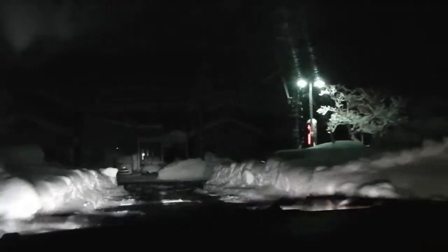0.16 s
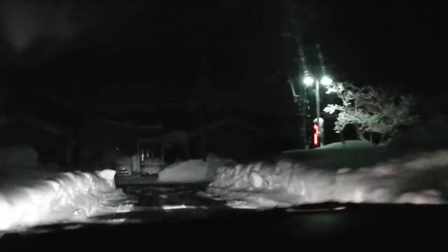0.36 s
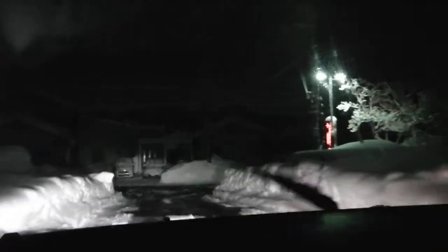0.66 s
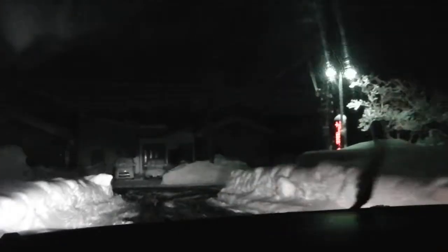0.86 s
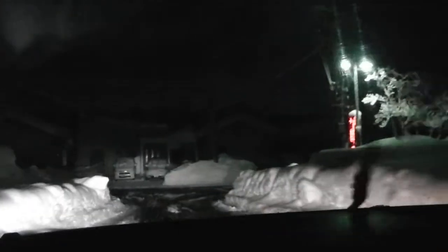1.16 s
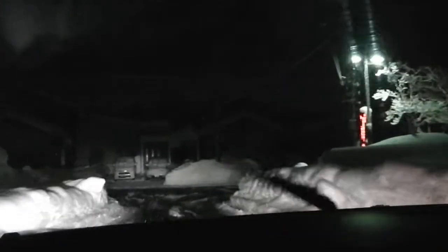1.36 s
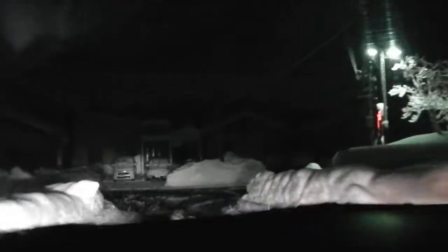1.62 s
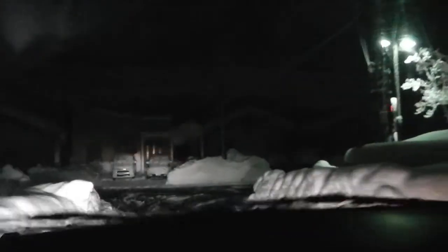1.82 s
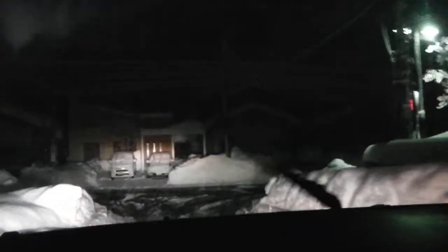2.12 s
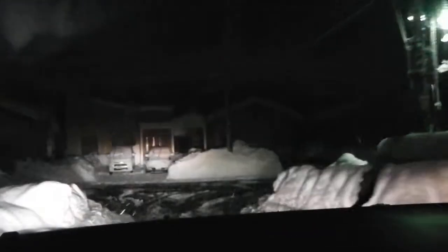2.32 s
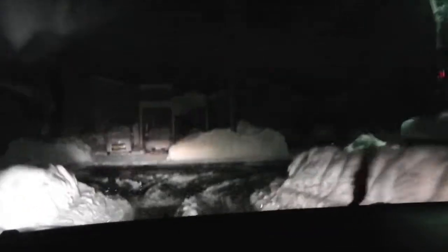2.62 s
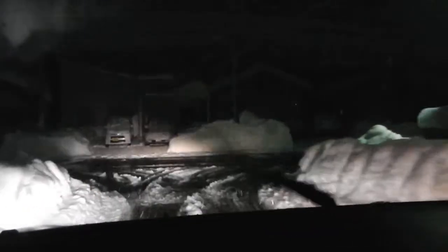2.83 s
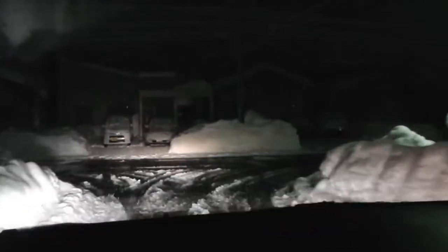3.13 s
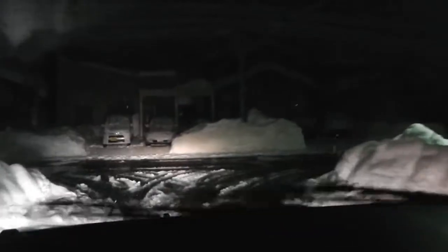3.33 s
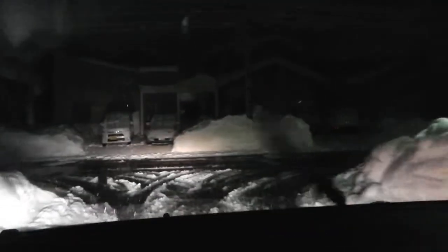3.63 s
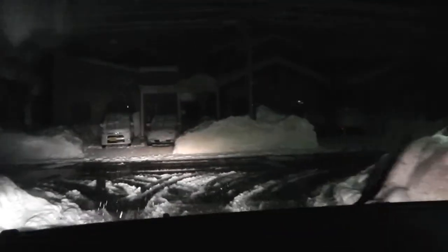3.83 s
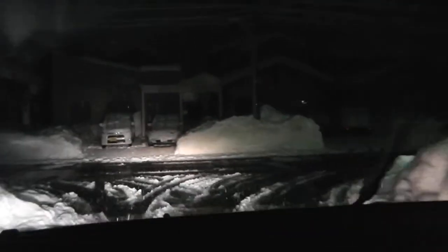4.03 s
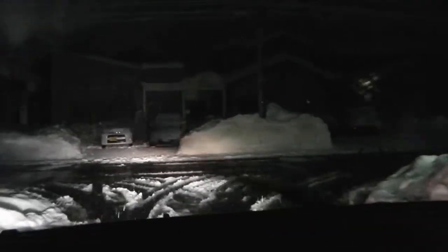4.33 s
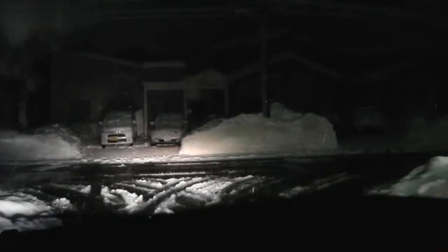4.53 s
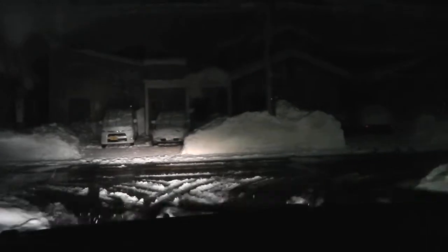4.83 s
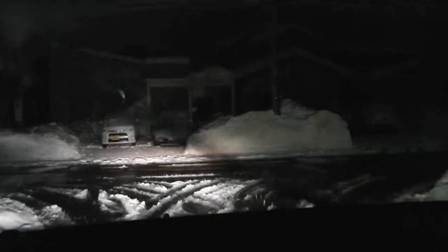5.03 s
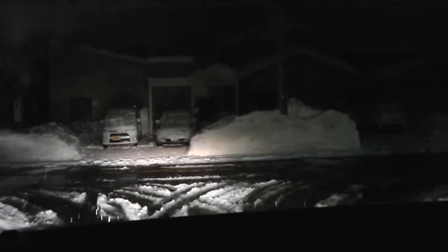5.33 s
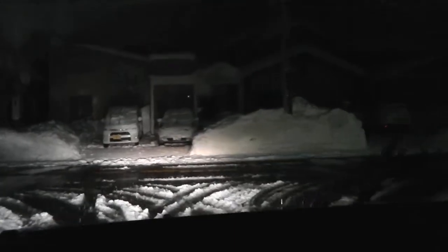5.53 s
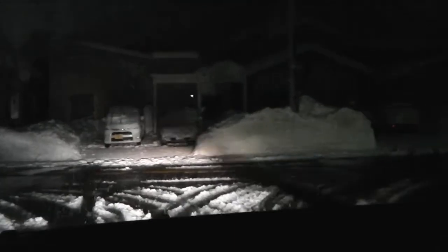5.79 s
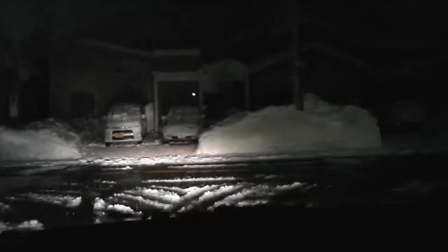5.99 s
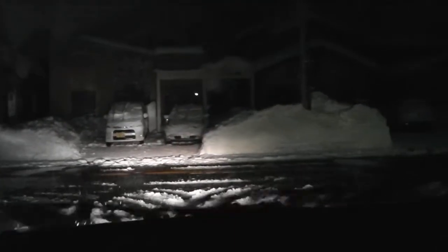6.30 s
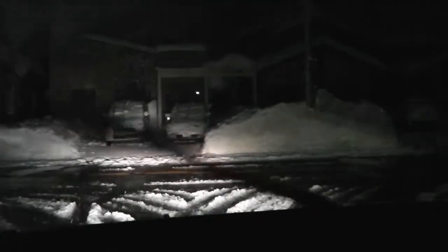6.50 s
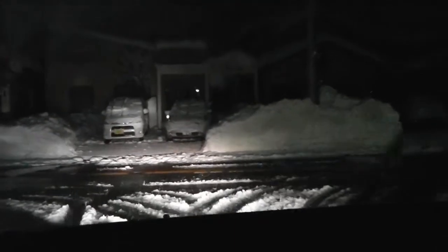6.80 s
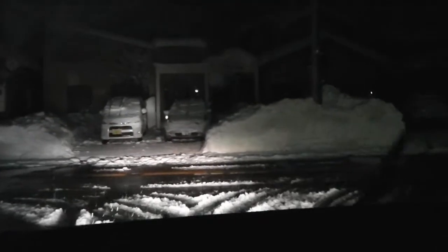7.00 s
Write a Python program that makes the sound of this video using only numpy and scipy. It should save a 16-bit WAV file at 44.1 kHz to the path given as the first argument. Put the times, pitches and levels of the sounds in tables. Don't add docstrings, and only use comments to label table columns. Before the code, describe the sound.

Muffled cabin boom and soft heater air, with periodic wiper knocks, a quick stalk clatter, then regular turn-signal ticking and small trim snaps.

```python
import sys
import numpy as np
from scipy import signal
from scipy.fft import rfft, irfft, next_fast_len
from scipy.io import wavfile
from scipy.ndimage import uniform_filter1d, map_coordinates

SR = 44100
rng = np.random.default_rng(int(sys.argv[2]) if len(sys.argv) > 2 else 0)


def voltage_ratio(level):
    return 10 ** (np.asarray(level, float) / 20)


def store_wav(level_fs):
    pcm = np.round(np.clip(np.atleast_2d(level_fs), -1, 1) * 32767)
    wavfile.write(sys.argv[1], SR, pcm.T.astype(np.int16))


N = 315315


def unit(x):
    return x / np.sqrt(np.mean(x ** 2) + 1e-20)


def along(points, hz):
    f, v = np.transpose(points)
    return np.interp(np.log(hz + 1), np.log(f + 1), v)


def curves(rows):
    s, *columns = np.transpose(rows)
    return [np.interp(np.arange(N) / SR, s, column) for column in columns]


def wobble(rate):
    knots = rng.standard_normal(int(N * rate / SR) + 4)
    return map_coordinates(knots, [np.arange(N) * rate / SR])


def filtered(x, response):
    n = x.shape[-1]
    m = next_fast_len(n + SR // 4)
    return irfft(rfft(x, m) * response(np.fft.rfftfreq(m, 1 / SR)), m)[..., :n]


def modes(rows):
    def response(f):
        return sum((-1) ** k * voltage_ratio(db) * 1j * f * width / (hz * hz - f * f + 1j * f * width)
                   for k, (hz, width, db) in enumerate(rows))
    return response


def below(response, edge_hz):
    return lambda f: response(f) / (1 + 1j * f / edge_hz) ** 2


def rush(response, patchy_db):
    z = signal.stft(rng.standard_normal((2, N)), nperseg=512)[2]
    field = uniform_filter1d(rng.standard_normal(z.shape[1:]), 6, 0)
    field = unit(uniform_filter1d(field, 10, 1))
    noise = signal.istft(z * voltage_ratio(patchy_db * field), nperseg=512)[1][:, :N]
    pair = filtered(noise, response)
    return pair / np.std(pair[0])


def steadied(pair, seconds):
    swell = uniform_filter1d(pair[0] ** 2, size=round(seconds * SR))
    swell = uniform_filter1d(swell, size=round(seconds * SR / 2))
    return pair / np.sqrt(np.abs(swell) + 0.096)


def shake(rise, t60):
    t = np.arange(SR // 5) / SR
    swell = (1 - np.exp(-t / max(rise, 1e-4))) ** 2
    return rng.standard_normal((2, len(t))) * swell * voltage_ratio(-60 * t / max(t60, 1e-3))


def ring(rows):
    hz, db, t60, delay = np.transpose(rows)[..., None]
    t = np.maximum(np.arange(SR // 5) / SR - delay, 0)
    level_db = db + 0.37 * rng.standard_normal(hz.shape)
    swell = voltage_ratio(level_db - 60 * t / t60) * (1 - np.exp(-t / 0.0011))
    phase = rng.random((2, len(rows), 1))
    return np.sum(swell * np.sin(2 * np.pi * (hz * t + phase)), axis=1)


def add(track, s, db, sound):
    peak = np.sqrt(2 * np.max(np.abs(uniform_filter1d(sound[0] ** 2, size=200))))
    track[:, round(s * SR):][:, :sound.shape[1]] += voltage_ratio(db) * sound / peak


# (time [s], level [dB], lean to the upper modes [dB])
ROAD = [(0.0, -31, 5), (0.38, -32, 1), (0.69, -27.5, 3.5), (0.92, -30, 6), (1.13, -30.5, 3.5),
        (2.15, -29, 0.5), (2.67, -31.5, -1), (3.23, -31, -3), (3.6, -32, -8.5), (3.96, -30.5, 0),
        (4.14, -34.5, -2), (4.48, -35.5, -6.5), (5.1, -35.5, -0.5), (5.79, -36, 0), (6.59, -39, -2.5),
        (6.97, -32, 8.5), (7.15, -39.5, -8)]
# (time [s], swell [dB])
RUTS = [(0.0, 19.5), (0.42, 1), (0.67, 0), (0.86, 7), (1.0, -15), (1.06, -4), (1.53, -4), (1.73, 7),
        (2.45, 5.5), (2.79, 10), (2.87, 9), (3.01, 4.5), (3.08, 1.5), (3.29, 5.5), (3.42, 6), (3.54, 1.5),
        (3.94, 10), (4.52, 1.5), (5.22, 4), (5.42, 8), (6.59, 9), (6.63, -6), (6.93, 8)]
# (frequency [Hz], width [Hz], level [dB])
LOW_BOOM = [(40.3, 23, -10), (65.7, 38.3, -10.5), (88.7, 20.4, -6)]
HIGH_BOOM = [(120.5, 13.3, -0.5), (155.3, 9.4, 0), (183.5, 13.2, -3.5)]


def boom():
    heave_s = 0.026
    lumpy_db, lumps_per_s = 2, 9
    shaking_db, lean_db = curves(ROAD)
    t = np.arange(N) / SR
    heave_db = sum(db * np.maximum(1 - np.abs(t - s) / (2 * heave_s), 0) for s, db in RUTS)
    low_db = shaking_db - 0.5 - lean_db / 2 + heave_db + lumpy_db * wobble(lumps_per_s)
    high_db = shaking_db - 3 + lean_db / 2 - 0.15 * heave_db + lumpy_db * wobble(lumps_per_s)

    def cabin(rows):
        steep = lambda f: modes(rows)(f) / (1 + (f / 215) ** 6)
        return steadied(rush(steep, patchy_db=-2.3), seconds=0.056)

    return voltage_ratio(low_db) * cabin(LOW_BOOM) + voltage_ratio(high_db) * cabin(HIGH_BOOM)


# (time [s], level [dB])
SLUSH = [
    (0.0, -63),
    (0.69, -67),
    (2.09, -63.5),
    (3.09, -66),
    (4.42, -66),
    (4.76, -63.5),
    (5.24, -66.5),
    (5.95, -67),
    (7.15, -60.5),
]
# (frequency [Hz], density [dB per Hz])
DUCTS = [(120, -4), (200, 0), (233, -6.5), (269, -4), (297, -9.5), (383, 0), (420, -4.5), (485, -2.5),
         (564, -6), (593, -6), (662, -2), (860, -9), (936, -10), (1300, -23), (1500, -21.5), (1950, -78),
         (3300, -120)]
RUB = [(650, -16), (1100, -6), (1210, -2.5), (1310, -10), (1670, -4.5), (2160, -9), (2480, -7.5),
       (3500, -10.5), (3940, -13.5), (4270, -15.5), (5230, -19.5), (6760, -28), (7500, -28), (9750, -57),
       (16500, -120)]
HISS = [(3530, -24), (6000, -4), (7820, -9.5), (8520, -6), (9240, -7), (9990, -7), (15900, -9)]


def air():
    shaking_db, lean_db = curves(ROAD)
    swing_db = shaking_db - shaking_db.mean()
    fan_db = -44.5 + 0.1 * swing_db + 0.15 * lean_db
    rub_db = -53.5 + 0.25 * swing_db
    hiss_db = 3.5 + curves(SLUSH)[0]
    flutter = wobble(12)

    def layer(db, shape, patchy_db):
        moving_db = db + 0.24 * flutter + 0.66 * wobble(25)
        return voltage_ratio(moving_db) * rush(lambda f: voltage_ratio(along(shape, f)), patchy_db)

    return layer(fan_db, DUCTS, 1.2) + layer(rub_db, RUB, 1.6) + layer(hiss_db, HISS, 0.8)


TRIM = [(0.3244, -46, 2600), (0.3322, -33, 2500), (1.6765, -34, 2200), (2.1081, -41, 1770),
        (2.176, -26, 1440), (2.4928, -33.5, 1450), (2.7708, -29.5, 2400), (3.2074, -36.5, 2380),
        (3.221, -38, 1570), (3.3485, -39, 1620), (3.5844, -35.5, 1500), (3.94, -27.5, 1650),
        (4.6937, -34, 2650), (5.4287, -24, 1900), (5.4291, -41, 2700), (6.1729, -41, 1830),
        (6.1914, -34, 1720)]
RUBBER = [
    (1.9889, -42, 3900),
    (2.177, -26.5, 4440),
    (2.7693, -31, 3820),
    (3.242, -33.5, 3900),
    (4.5537, -34, 3750),
    (4.573, -39, 3940),
    (4.6786, -31, 3970),
    (5.001, -36, 4040),
]
CRUST = [
    (1.0096, -46, 3800),
    (1.0793, -37.5, 5300),
    (1.3766, -29, 5170),
    (1.6756, -38, 4400),
    (6.9, -42.5, 4900),
    (6.939, -41, 4900),
]
SPRAY = [
    (1.9565, -40.5, 9500),
    (3.7698, -47, 9500),
    (6.3094, -57, 9500),
    (6.8838, -47, 9400),
    (6.9097, -47, 9400),
    (7.0698, -43, 9500),
]
# (treble [dB], width over centre [ratio], t60 [s])
SNAP_KINDS = [
    (-28, .82, 0.058),
    (-19, 0.54, 0.021),
    (-7.5, 0.59, 0.071),
    (-3, 0.97, .06),
]


def snaps(track):
    for rows, (treble_db, breadth, t60) in zip((TRIM, RUBBER, CRUST, SPRAY), SNAP_KINDS):
        edge = modes([(12000, 6000, treble_db / 2)])
        for s, db, hz in rows:
            body = modes([(hz, breadth * hz, 0)])
            sound = filtered(shake(0.0018, t60), lambda f: body(f) ** 2 + edge(f) ** 2)
            add(track, s - 0.002, db - 8, sound)


# (time [s], peak level [dB], pitch [Hz])
THUMPS = [(0.007, -27, 105), (0.407, -24, 115), (1.077, -24, 123), (1.402, -18.5, 125), (1.571, -24.5, 158),
          (1.701, -19, 149), (1.929, -27, 159), (2.15, -20, 121), (2.497, -18.5, 104), (2.54, -19, 137),
          (2.772, -23, 109), (3.4, -25, 107), (3.898, -21.5, 151), (3.938, -17.5, 125), (5.419, -19.5, 118),
          (5.442, -16.5, 131), (6.887, -22, 115), (6.913, -19, 129),
          (1.004, -13, 130),
]
# (time [s], peak level [dB], tilt [dB per octave])
FLOPS = [(0.306, -38.5, 13), (0.982, -27, -5), (1.007, -29.5, -1), (1.029, -27.5, 2), (1.044, -26, 0.6),
         (1.058, -30.5, 1.5), (2.055, -33, 1), (2.111, -30, -0.6), (2.442, -29.5, -4.5),
         (2.504, -26.5, -1.2), (2.633, -26.5, -2.5), (2.769, -30, 7.5), (3.224, -32.5, 1.5),
         (3.906, -27.5, -9), (3.94, -29.5, 2.5), (3.974, -26, 0.5), (3.988, -37, 0), (4.438, -35.5, -2),
         (4.697, -32.5, 3), (5.338, -32, -12), (5.399, -28, -0.6), (5.454, -27, 0), (5.475, -36, -5),
         (5.537, -38, -6), (6.853, -39, -2), (6.89, -32.5, -2), (6.924, -34.5, 5.5), (6.951, -26, 4),
         (6.964, -45, -1.2)]
# (frequency [Hz], width [Hz], level [dB])
GLASS = [(300, 52, -6), (397.2, 20.6, 10.5), (528, 38, 1.5), (667, 51, 0.5), (810, 57, -2),
         (1056, 130, -10), (1440, 220, -8), (1900, 2000, -21.5)]
# (time [s], peak level [dB], delay of second tick [s])
SWEEP_ENDS = [
    (0.9464, -44, 0.039),
    (2.435, -51, .018),
    (3.8633, -46.5, 0.044),
    (5.3567, -46, .0333),
    (6.8433, -45, 0.045),
]
# (frequency [Hz], level [dB])
SLACK = [
    (3050, -1.5),
    (2820, -3.5),
]


def wipers(track):
    push = np.pad(np.hanning(SR // 400), (0, SR // 5)) * np.ones((2, 1))
    for s, db, hz in THUMPS:
        panel = modes([(hz, 48, 0)])
        add(track, s, db - 1, filtered(push, lambda f: panel(f) ** 2))
    for s, db, tilt_db in FLOPS:
        glass = [(hz, width, level_db + tilt_db * np.log2(hz / 600)) for hz, width, level_db in GLASS]
        flop = filtered(shake(rise=0.004, t60=0.075), below(modes(glass), edge_hz=1560))
        add(track, s - 0.004, db - 3.5, flop)
    for s, db, later in SWEEP_ENDS:
        for k, (hz, level_db) in enumerate(SLACK):
            joint = modes([(hz, 450, 0)])
            tick = filtered(shake(0.00069, 0.037), lambda f: joint(f) ** 2)
            add(track, s + k * later - 0.003, db + level_db + 1.5, tick)


# (time [s], peak level [dB], knock [dB])
STALK = [(1.319, -29.5, -10), (1.3254, -22.5, -29), (1.3355, -29.5, -20), (1.3562, -31, -16),
         (1.3658, -26.5, -15), (1.3753, -19.5, -1), (1.3886, -28, -6), (1.7128, -21.5, -7),
         (1.717, -17.5, -8), (1.7239, -17, 5), (1.7358, -25, 0)]
# (frequency [Hz], width [Hz], level [dB])
STALK_MODES = [(1620, 200, -0.5), (2400, 400, -6.5), (3080, 510, -3.5), (4950, 1000, -6), (6200, 1600, -10),
               (10200, 3600, -16.5), (14900, 2500, -18)]
COLUMN = [(490, 340, 10.5), (1140, 180, 9), (1780, 800, -6)]
# (frequency [Hz], level [dB], t60 [s], delay [s])
LEVER_RING = [(1598, -1, 0.036, 0), (3280, 5, 0.027, 0.00094), (3520, -2.5, 0.029, .003), (5280, 2, .03, 0)]


def stalk(track):
    housing = modes(STALK_MODES)
    column = below(modes(COLUMN), edge_hz=3000)
    for s, db, knock_db in STALK:
        body = lambda f: housing(f) + voltage_ratio(knock_db) * column(f)
        add(track, s - 0.002, db - 7, filtered(shake(rise=0.002, t60=0.048), body))
        add(track, s, db - 20 - 0.4 * knock_db, ring(LEVER_RING))


# (frequency [Hz], level [dB], t60 [s], delay [s])
CASE_RING = [(1180, -7.5, 0.029, 0.0037), (2084, -6.5, 0.042, 0.0021), (2864, 4.5, 0.031, 0.0018),
             (3340, -17, 0.032, .003), (3770, -7.5, 0.039, .007), (3440, -12, 0.05, 0.0099)]
# (frequency [Hz], width [Hz], level [dB])
MAKE_MODES = [(2160, 820, -12.5), (3550, 320, -0.5), (6800, 1400, -13.5), (9300, 6900, -27)]
BREAK_MODES = [(1830, 360, 1.5), (2300, 330, 8), (2950, 450, 4.5), (4170, 210, 3.5), (6140, 580, -1),
               (9000, 660, -2), (13300, 12000, -5.5)]


def relay(track):
    first_s, blink_s, lit_s, blinks = 1.701, 0.6824, 0.34, 8
    make_db, break_db = -23.5, -38
    closing, opening = shake(0.0043, 0.055), shake(0.0031, 0.031)
    for s in first_s + blink_s * np.arange(blinks):
        add(track, s - 0.003, make_db - 12.5, ring(CASE_RING))
        tick = filtered(closing + 0.5 * shake(0.0011, 0.044), modes(MAKE_MODES))
        add(track, s - 0.005, make_db - 17, tick)
        tock = filtered(opening + 0.5 * shake(0.0049, 0.063), modes(BREAK_MODES))
        add(track, s + lit_s - 0.0045, break_db - 1.5, tock)


def ports(pair, wide, lean):
    own = filtered(pair[1], lambda f: voltage_ratio(along(wide, f)))
    leaked = filtered(pair[0], lambda f: along(lean, f))
    return np.array([pair[0], own + leaked])


# (frequency [Hz], level [dB])
WIDE_NEAR = [(100, -37), (1000, -10), (2500, -9.5), (4000, -0.5), (6000, 2.5), (9000, 7.5), (15000, 7)]
WIDE_AIR = [(100, -21), (400, -15), (1000, -10), (2500, -3.5), (5000, 2.5), (10000, 5), (15000, 3)]
# (frequency [Hz], share [ratio])
LEAN_NEAR = [(150, 0.14), (1000, -0.02), (3000, -0.16), (6000, -0.5), (10000, -0.8), (15000, -.1)]
LEAN_AIR = [(150, 0.16), (500, 0.083), (1400, -0.054), (5000, -0.063), (14000, -0.046)]


def scene():
    near = np.zeros((2, N + SR))
    for source in (snaps, wipers, stalk, relay):
        source(near)
    close = ports(near[:, :N], WIDE_NEAR, LEAN_NEAR)
    diffuse = ports(boom() + air(), WIDE_AIR, LEAN_AIR)
    mid, side = close + diffuse
    return np.array([mid + side, mid - side])


def low_pass(x):
    return signal.sosfilt(signal.butter(12, 16340, fs=SR, output="sos"), x)


def record(dry):
    def port(f):
        notch = 1 - 0.49 / (1 + ((f - 7850) / 450) ** 2)
        low_cut = (f / 22) ** 2 / (1 + (f / 22) ** 2)
        return notch * (f < 15920) * low_cut

    return low_pass(filtered(dry, port))


dry = scene()
out = record(dry)
store_wav(out)
```